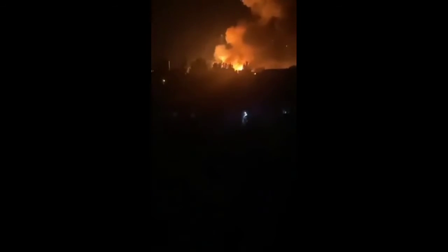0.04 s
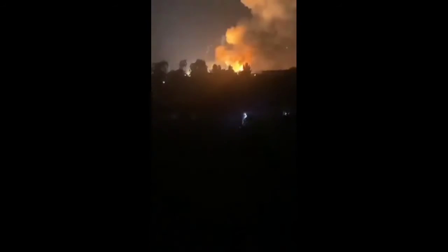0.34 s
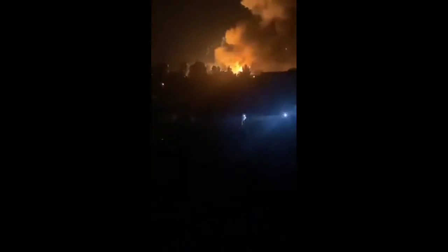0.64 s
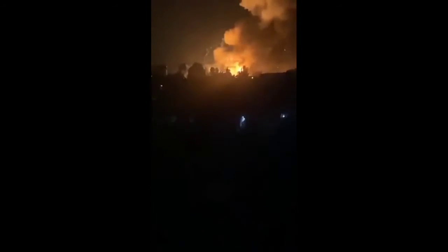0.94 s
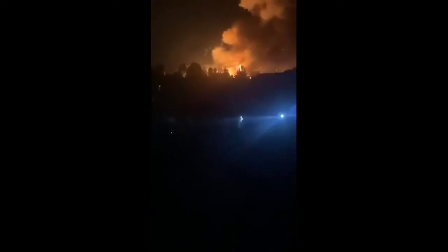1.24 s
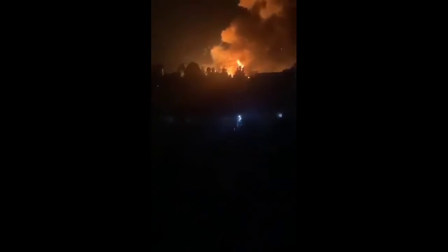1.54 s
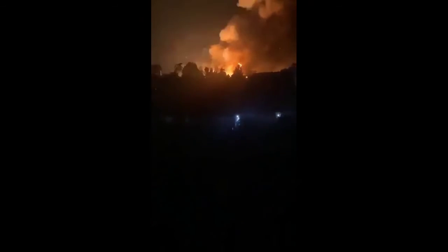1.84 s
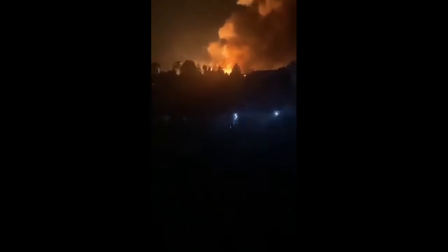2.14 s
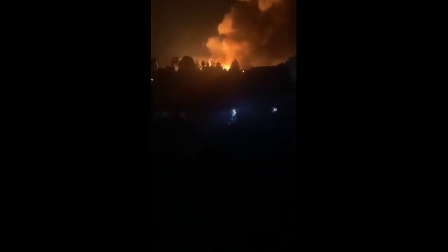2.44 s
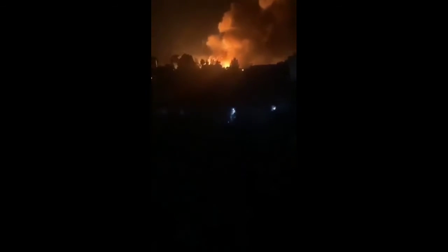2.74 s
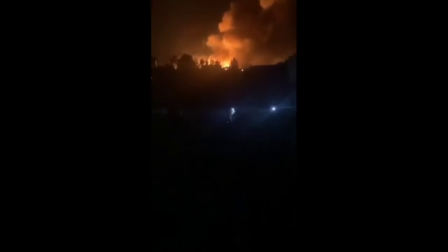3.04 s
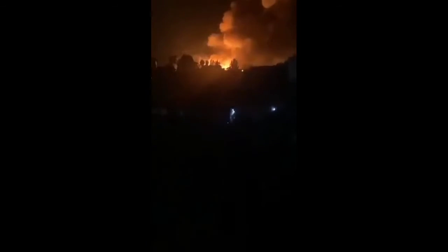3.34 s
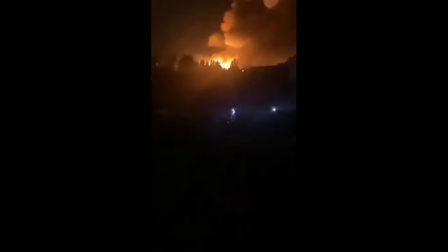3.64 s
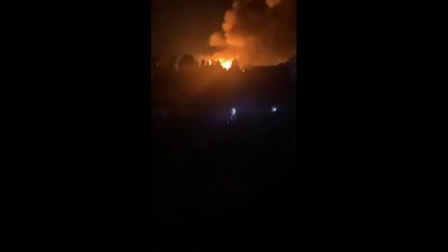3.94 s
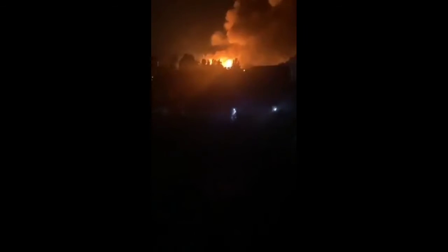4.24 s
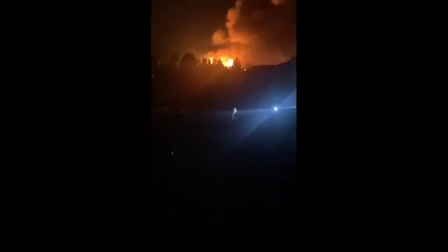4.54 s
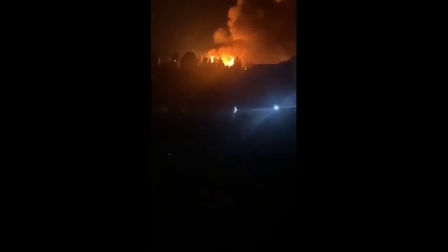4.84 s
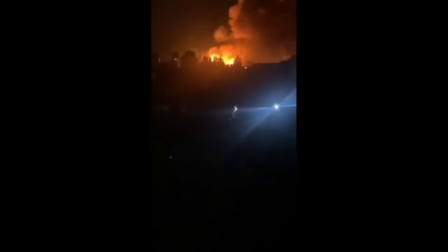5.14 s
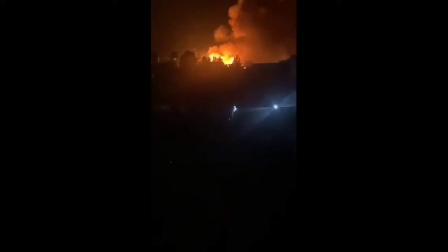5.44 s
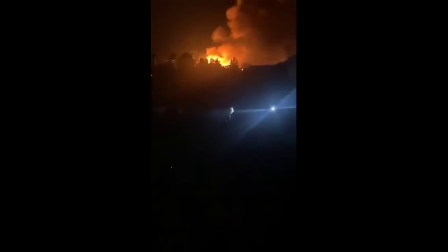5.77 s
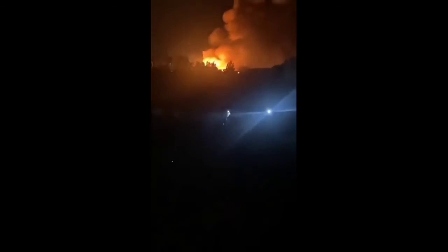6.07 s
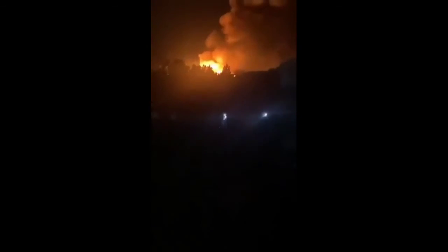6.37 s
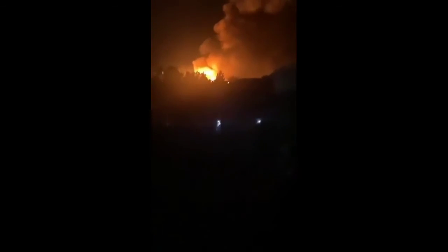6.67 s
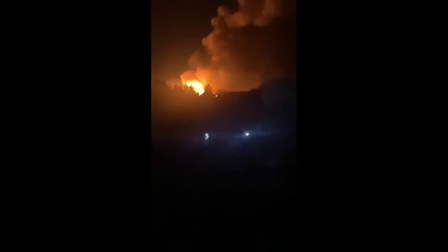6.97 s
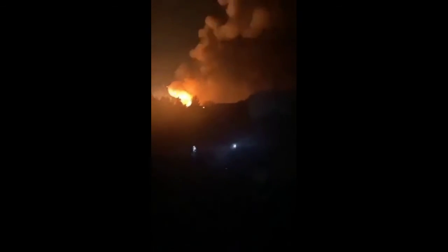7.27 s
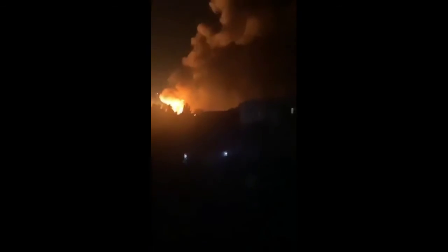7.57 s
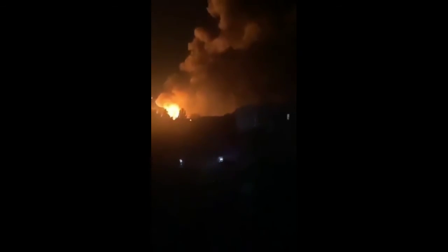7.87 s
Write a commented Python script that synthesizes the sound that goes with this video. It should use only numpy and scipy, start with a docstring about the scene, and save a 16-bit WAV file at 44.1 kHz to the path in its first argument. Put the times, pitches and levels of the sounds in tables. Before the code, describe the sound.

Explosions go off one after another in a distant blaze, over a constant low rumble and a barely audible buzz of crickets. They start modestly, then thicken into clusters of snapping cracks, rough blasts and heavy thuds, each surge trailing long echoes across the hills. After a brief lull comes one more loud crack and a final string of booms. The microphone, in an open field, briefly distorts on the strongest shocks.

```python
"""A field at night, far from a large fire in which things explode one after another.
The fire roars, echoes roll back from the hills, and bush crickets buzz faintly in the field.
Each shock lands as a sharp crack or a low thud, or is scattered by trees and slopes into a ragged burst.
Roar, rolls and bursts are swarms of tiny reflected shocks, shaped octave by octave.
The loudest pressure waves overload the microphone and crackle."""
import sys
import numpy as np
from scipy import signal
from scipy.fft import rfft, irfft, next_fast_len
from scipy.io import wavfile
from scipy.ndimage import map_coordinates

SR = 44100
rng = np.random.default_rng(int(sys.argv[2]) if len(sys.argv) > 2 else 0)


def generate_wav(signal):
    """Clip the signal to [-1, 1] and save it as 16-bit WAV at the path in sys.argv[1]."""
    frames = np.transpose(np.atleast_2d(signal))
    scaled = np.clip(frames, -1, 1) * 32767
    pcm = np.round(scaled).astype(np.int16)
    wavfile.write(sys.argv[1], SR, pcm)


N = 357651
T = np.arange(N) / SR
OCTAVES_HZ = 31.25 * 2. ** np.arange(10)

# the fire's steady bed: level/dB, treble/dB, bass/dB
FIRE_ROAR = (-22.5, -2.5, -2.5)
# long echoes off the hills: t/s, level/dB, hold/s, t60/s, treble/dB, bass/dB
HILL_ROLLS = [(-.1, -20, 0.06, 1.6, -1.5, 5), (0.167, -23.5, 0.12, .4, -7.5, 5.5),
              (1.043, -18, 0.053, 3.2, -2, 3.5), (1.454, -18.5, 0.21, 1.5, -0.5, -4.5),
              (1.82, -18, 0.4, 2.7, 3, 4), (2.173, -9.5, 0.12, 0.64, -10, -1),
              (2.485, -13, 0.56, 3.8, 5, -0.5), (3.11, -14.5, 0.31, 1.06, 6, 0.5),
              (3.53, -17, 0.089, 0.8, 5, 0.5), (4.186, -13.5, 0.37, 2.5, -3.5, 0),
              (4.848, -19.5, 0.037, 7.6, -6, 3.5), (5.398, -21, 0.3, 0.74, -6.5, 4.5),
              (5.892, -10, 0.087, 0.86, 1, 0.5), (6.159, -13, 0.23, 4.5, -3, 2.5),
              (7.309, -12.5, 0.036, 1.4, -5.5, -0.5)]
# sharp shock fronts: t/s, level/dB, tilt/(dB/octave), echo decay/s
SHOCK_CRACKS = [(0.282, -23, -1, .002), (1.18, -23.5, 3, .004), (1.625, -19, -5, .004),
                (1.818, 0.5, -1, .005), (1.822, -5, 0, 0.0033), (2.252, -18, 9, .03), (2.268, 7, 0, 0.0047),
                (2.274, -4, 1, .003), (2.868, -5, -4, .004), (3.036, 0.5, .5, 0.0022),
                (3.04, -1, 0.5, .003), (3.315, -8, -1, 0.0035), (3.922, -10, -8, .006),
                (4.242, -9, -9, 0.0055), (4.321, -8.5, -3.5, 0.0047), (4.538, -9, 1, .004),
                (5.07, -9, -7, .004), (5.765, -7.5, -5.5, .002), (5.897, 5.5, -2.5, 0.0047),
                (5.901, -3, 2, .002), (5.984, -5, -3, .004), (7.135, -13, -6, .004), (7.403, -10, -6, .003),
                (7.446, -10, -8.5, .003), (7.505, -5.5, -4.5, .002)]
# scattered blasts: t/s, level/dB, swell/s, t60 at 500 Hz/s, tilt/(dB/octave), midrange bite/dB
BURSTS = [(.612, -20, 0.0081, 0.93, -2, -0.5), (.72, -15.5, .019, 0.55, -3, -1),
          (.779, -15, 0.029, 0.62, -2, 0), (1.03, -15, 0.011, 0.38, -2.5, -1),
          (1.118, -10, 0.063, 0.69, 0, 1), (1.614, -21.5, 0.0083, 0.43, -11, 1),
          (1.783, -15, 0.031, 0.18, 4, 7), (1.814, -5.5, 0.005, 0.47, 4, -4), (1.842, -4, 0.025, 0.3, 3, 0),
          (2.252, -21, 0.0095, 1.44, 8, -2), (2.575, -11.5, 0.022, 0.18, -8, 0),
          (2.72, -12.5, 0.017, 0.31, 1.5, 6), (2.77, -9, 0.034, 0.49, 0.5, 0),
          (2.96, -7, 0.053, 0.45, 1.5, -11.5), (3.033, -3, 0.0034, 0.22, 3.5, -10.5),
          (3.215, -19.5, 0.023, 0.28, 0, 15), (3.29, -14, 0.031, 0.25, 2, 10.5),
          (3.504, -14.5, 0.0092, 0.22, -7.5, 5), (3.715, -21.5, 0.017, 0.33, 1, 11),
          (4.055, -22, 0.016, 0.22, 0, 17.5), (4.237, -14.5, 0.04, 0.42, -4, 1),
          (4.318, -12.5, 0.024, 0.43, 1.5, 0.5), (4.504, -7.5, 0.032, 0.79, -0.5, 1.5),
          (4.625, -12.5, 0.017, 0.56, -1, 7.5), (5.19, -22, .012, 0.13, -3, 7),
          (5.555, -19.5, 0.012, 0.26, -6.5, -2), (5.895, -5, 0.0012, 1.02, 2, -8),
          (5.948, -8, 0.038, 0.24, -0.5, 8), (6.59, -20, 0.048, 0.45, 0.5, 5.5),
          (6.79, -17, 0.013, 0.14, 0, 1.5), (7.104, -12.5, .014, 0.64, -1, 12.5),
          (7.391, -19.5, .015, .3, -2, 0), (7.484, -16, 0.013, 0.68, -3, 5),
          (8.015, -14, 0.03, 0.13, -2, -6)]
# the heavy low hits: t/s, level/dB, f/Hz, swell/s
DEEP_THUDS = [(0.811, -17, 113, 0.011), (1.189, -5, 85.2, 0.021), (1.809, -6, 86.4, 0.02),
              (1.885, -2, 84, 0.0086), (1.975, -12.5, 89, 0.012), (2.084, -6, 79.5, 0.018),
              (2.205, -2, 81, 0.0074), (2.255, -5, 82.4, 0.023), (2.346, -4, 81.4, 0.0083),
              (2.41, -2, 75, 0.018), (2.57, -2, 89.7, 0.0079), (2.676, -5.5, 80, 0.011),
              (2.778, -4, 80.6, 0.02), (2.893, -9, 87, 0.03), (3.048, -6, 92.6, 0.0065),
              (3.159, -9, 98, 0.016), (3.231, -9, 89, 0.011), (3.311, -4.5, 88, 0.016),
              (3.398, -9, 78, 0.021), (3.542, -7.5, 86, 0.012), (3.616, -9.5, 87, 0.0097),
              (4.249, -10.0, 91, 0.0095), (4.303, -4, 82.6, 0.015), (4.359, -5, 84.4, 0.014),
              (4.416, -2.5, 89, 0.012), (4.479, -2, 86.1, 0.022), (4.553, -6, 94, 0.014),
              (4.623, -4.0, 95, 0.0085), (4.808, -8.5, 101.4, 0.015), (4.93, -0.5, 93, 0.0079),
              (5.302, -7.0, 88.4, 0.019), (5.576, -14.5, 173, 0.011), (5.69, -11.0, 103, 0.0088),
              (5.922, -5.5, 88, 0.018), (5.996, -4.0, 77.7, 0.035), (6.112, -3.5, 86, 0.0068),
              (6.262, -5.5, 92.3, 0.02), (6.359, -2, 78.7, 0.009), (6.39, -2.5, 77.5, 0.022),
              (6.474, -5, 80, 0.014), (6.534, -6.5, 92, 0.0098), (6.649, -6.5, 88.5, 0.017),
              (6.717, -6.5, 95, 0.012), (6.774, -14, 83, 0.014), (6.839, -14.5, 82, 0.0091),
              (6.901, -3, 79.2, 0.014), (7.034, -6.5, 94, 0.014), (7.117, -6, 180, 0.011),
              (7.396, -7, 93, 0.008), (7.567, -8, 95, 0.0073)]

# base EQ of roar and rolls: f/Hz, level/dB
ROLL_EQ = [(20, -22.5), (45, -11.5), (65, -5), (86, -.5), (115, -2), (160, -7), (260, -8.5), (420, -14),
           (680, -14.5), (950, -21.5), (1600, -27.5), (3000, -43.5), (5800, -69.5), (6600, -93)]
# the crickets' two bands: f/Hz, level/dB
CRICKET_EQ = [(4600, -30.5), (5400, -3.5), (6100, -3.5), (6400, -36.5), (8200, -35), (8350, -5.5),
              (8850, -0.5), (9100, -5.5), (9300, -15.5), (9500, -47.5)]
# base EQ of a shock front: f/Hz, level/dB
CRACK_EQ = [(30, -24.5), (150, 0), (500, 9), (1100, 1.5), (2600, -14.5), (5000, -40), (7200, -56.5),
            (15000, -93.5)]
# base EQ of a burst: f/Hz, level/dB
BURST_EQ = [(20, -15.5), (50, -4.5), (85, 3.5), (150, 3), (300, -2.5), (650, -5), (1000, -14), (1700, -21),
            (3000, -34), (5700, -54), (6700, -73.5), (15000, -115)]

# where a near path's harsh midrange bites: f/Hz, weight
BITE_CURVE = [(700, 0.15), (1300, 0.55), (2700, 0.9), (4500, 0)]
# where the rolls' treble and bass, the bursts' boom and the turbulence act: f/Hz, weight
TREBLE_CURVE = [(450, 0.0081), (1400, 0.91), (4000, 1.43)]
BASS_CURVE = [(70, 0.91), (250, 0.43)]
BOOM_CURVE = [(90, 0.29), (250, 0.05)]
TURBULENCE_CURVE = [(250, 0.069), (700, 0.93), (2200, 1.97)]


def undb(db):
    """Decibels to gain."""
    return 10 ** (np.asarray(db) / 20)


def curve_at(hz, curve):
    """Read a curve between its points on a log frequency axis."""
    f, values = np.transpose(curve)
    return np.interp(np.log(np.maximum(hz, 1)), np.log(f), values)


def pressure_pulse(eq, tilt_db=0, size=4096):
    """A unit-energy click with this EQ, tilted about 500 Hz."""
    hz = np.maximum(np.fft.rfftfreq(size, 1 / SR), 20)
    db = curve_at(hz, eq) + tilt_db * np.log2(hz / 500)
    cepstrum = irfft(np.log(undb(db)))
    cepstrum[1:size // 2] *= 2  # minimum phase: no ringing before the hit
    cepstrum[size // 2 + 1:] = 0
    pulse = irfft(np.exp(rfft(cepstrum)))
    return pulse / np.sqrt(np.sum(pulse ** 2))


def octave_bands(x):
    """Split a sound into overlapping octaves that sum back to it."""
    size = next_fast_len(len(x))
    log_hz = np.log(np.maximum(np.fft.rfftfreq(size, 1 / SR), 1))
    spectrum = rfft(x, size)
    windows = [np.interp(log_hz, np.log(OCTAVES_HZ), solo) for solo in np.eye(len(OCTAVES_HZ))]
    return [irfft(spectrum * window, size)[:len(x)] for window in windows]


def add(track, start_s, sound):
    """Drop a sound onto the track at its cue."""
    i = max(int(start_s * SR), 0)
    track[i:i + len(sound)] += sound[:max(N - i, 0)]


def drift(rate_hz):
    """Gliding random modulation with a spread near 1."""
    knots = rng.standard_normal(1024)
    return 1.22 * np.interp(T * rate_hz, np.arange(len(knots)), knots)


def hillside(x, share=0.32, count=3):
    """A few strong detours over the slopes; moving air shifts them into a wandering comb filter."""
    out = x.copy()
    for delay_s in rng.uniform(0.00192, .012, count):
        out += share * drift(11) * np.interp(T - delay_s - 0.0003 * drift(4), T, x)
    return out / np.sqrt(1 + count * share ** 2)


def turbulence(x, depth_db=2.0, patch_hz=260, patch_s=.04, size=512):
    """Hot, churning air focuses and scatters the sound: patches above the bass swell and fade."""
    hz, t, cells = signal.stft(x, SR, nperseg=size)
    grid = np.meshgrid(hz / patch_hz, t / patch_s, indexing="ij")
    patches = map_coordinates(rng.standard_normal((256, 512)), grid, order=1, mode="mirror")
    gain = undb(depth_db * curve_at(hz, TURBULENCE_CURVE)[:, None] * patches)
    return signal.istft(cells * gain, SR, nperseg=size)[1][:N]


def shock_swarm(eq, per_second, spread_db):
    """A dense texture of small reflected shocks of uneven size, at unit rms."""
    arrivals = rng.random(N) < per_second / SR
    polarity = rng.choice([-1, 1], N)
    sizes = undb(spread_db * np.clip(rng.standard_normal(N), -2, 2))
    shocks = hillside(arrivals * polarity * sizes)
    swarm = turbulence(signal.oaconvolve(shocks, pressure_pulse(eq))[:N])
    return swarm / np.std(swarm)


def roar_and_rolls(swell_s=0.097, flutter_db=1.0):
    """Echoes swell, hold and die over the fire's roar: near slopes rattle brightly, far ones boom."""
    envelopes, tones = [np.ones(N)], [FIRE_ROAR]
    for start_s, db, hold_s, t60, treble, bass in HILL_ROLLS:
        attack = np.clip((T - start_s) / swell_s, 0, 1)
        tail = undb(-60 * np.maximum(T - start_s - swell_s - hold_s, 0) / t60)
        envelopes.append(attack * tail)
        tones.append((db, treble, bass))
    powers = np.array(envelopes) ** 2
    level_db, treble_db, bass_db = np.transpose(tones)
    swarm = shock_swarm(ROLL_EQ, per_second=4500, spread_db=2)
    out = np.zeros(N)
    for hz, band in zip(OCTAVES_HZ, octave_bands(swarm)):
        gains = undb(level_db + curve_at(hz, TREBLE_CURVE) * treble_db + curve_at(hz, BASS_CURVE) * bass_db)
        out += band * np.sqrt(gains ** 2 @ powers) * undb(flutter_db * drift(22))
    return out


def treble_cut(x, cutoff_hz=6100):
    """A steep low-pass near 6 kHz dulls the roar, rolls and bursts."""
    return signal.sosfilt(signal.butter(10, cutoff_hz, fs=SR, output="sos"), x)


def crickets(level_db=-76.5, waver_db=0.9):
    """Bush crickets in the field merge into two faint, even bands of buzz."""
    eq = undb(curve_at(np.fft.rfftfreq(N, 1 / SR), CRICKET_EQ))
    buzz = irfft(rfft(rng.standard_normal(N)) * eq, N)
    return buzz / np.std(buzz) * undb(level_db + waver_db * drift(9))


def cracks(edge_gap_s=0.00075, echo_db=-13):
    """An N-shaped shock snaps with two steep edges; nearby ground and trees add a spray of echoes."""
    out, t = np.zeros(N), T[:SR // 6]
    for start_s, db, tilt_db, decay_s in SHOCK_CRACKS:
        spray = rng.standard_normal(len(t)) * (rng.random(len(t)) < .1)
        paths = spray * undb(echo_db) * np.exp(-t / decay_s)
        paths[[0, int(edge_gap_s * SR)]] = 1  # the two edges
        front = pressure_pulse(CRACK_EQ, tilt_db)
        add(out, start_s, signal.fftconvolve(paths, front) * undb(db) / np.abs(front).max())
    return out


def bursts(boom_pivot_db=-9.5, boom_slope=1.44):
    """Each burst swells as more scattered paths arrive, then dies away, top end first."""
    out, t = np.zeros(N), T[:SR]
    swarm = shock_swarm(BURST_EQ, per_second=3800, spread_db=4)
    for hz, band in zip(OCTAVES_HZ, octave_bands(swarm)):
        octave = np.log2(hz / 500)
        boom, bite = curve_at(hz, BOOM_CURVE), curve_at(hz, BITE_CURVE)
        power = np.zeros(N)
        for start_s, db, swell_s, t60, tilt_db, bite_db in BURSTS:
            boom_db = boom_slope * (db - boom_pivot_db)  # big charges gain bass, small ones lose it
            eq_db = tilt_db * max(octave, -1) + boom_db * boom + bite_db * bite  # no tilt below 250 Hz
            attack = np.minimum(t / swell_s, 1)
            tail = undb(-60 * np.maximum(t - swell_s, 0) / t60 * 2 ** (0.077 * octave))
            add(power, start_s, (undb(db + eq_db) * attack * tail) ** 2)
        out += band * np.sqrt(power)
    return out


def thuds(weak_from_s=1, weak_per_s=2.1, weak_db=-18.5, weak_hz=86, weak_swell_s=0.021):
    """Far shocks lose their edge and land as a few slow swings of pressure; weak ones fall at random."""
    out, t = np.zeros(N), T[:SR // 4]
    wait, softness, pitch = rng.random((64, 3)).T
    times = weak_from_s + np.cumsum(-np.log(1 - wait)) / weak_per_s
    levels = weak_db - 6 * softness
    pitches = weak_hz * (1 + .1 * (2 * pitch - 1))
    weak = [(*hit, weak_swell_s) for hit in zip(times, levels, pitches)]
    for start_s, db, hz, swell_s in DEEP_THUDS + weak:
        envelope = (t / swell_s * np.exp(1 - t / swell_s)) ** 1.2
        add(out, start_s, undb(db) * envelope * np.sin(2 * np.pi * hz * t))
    return out


def scene():
    """A mono mix: the fire and its blasts lie in one direction, beyond the crickets."""
    scattered = treble_cut(roar_and_rolls() + bursts())
    return (scattered + cracks() + thuds() + crickets())[None]


def record(dry, drive_db=0.31, ceiling=.705, knee=0.025, top_hz=15500):
    """The microphone clips the loudest waves into a crackle; a steep low-pass follows."""
    x = dry * undb(drive_db)
    into_knee = np.clip(np.abs(x) - ceiling + knee, 0, 2 * knee)
    clipped = np.sign(x) * (np.minimum(np.abs(x), ceiling + knee) - into_knee ** 2 / (4 * knee))
    return signal.sosfilt(signal.ellip(8, .2, 70, top_hz, fs=SR, output="sos"), clipped)


dry = scene()
out = record(dry)
generate_wav(out)
```